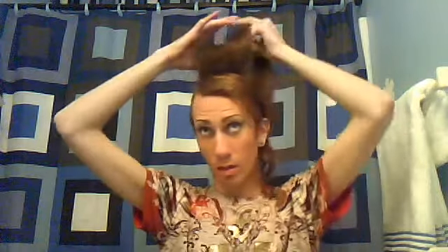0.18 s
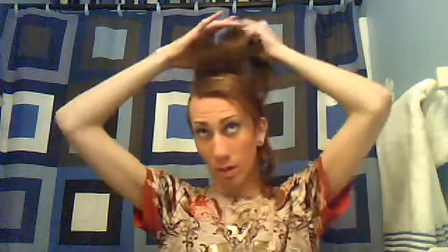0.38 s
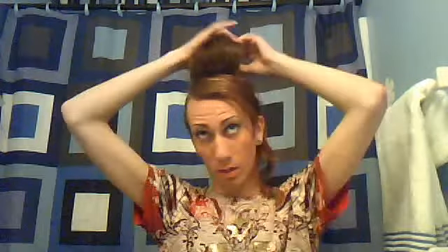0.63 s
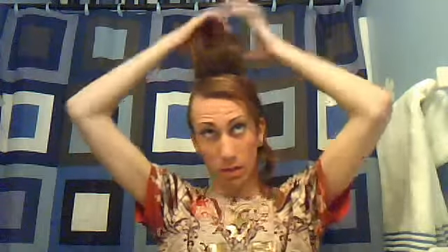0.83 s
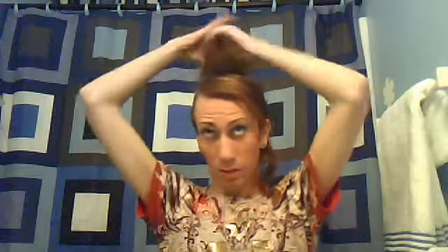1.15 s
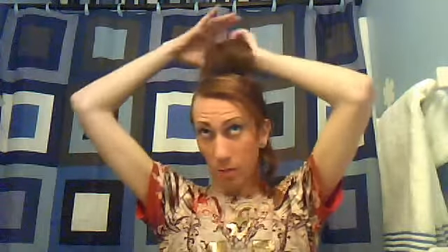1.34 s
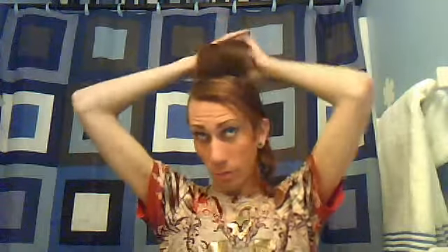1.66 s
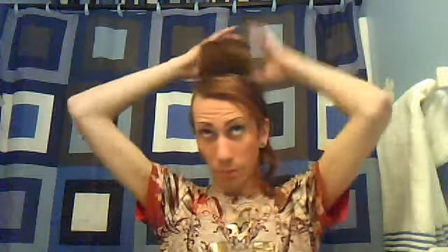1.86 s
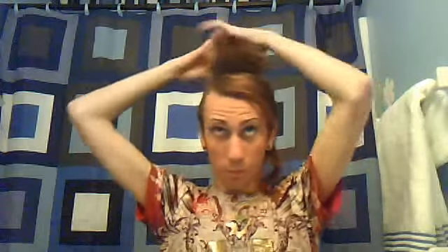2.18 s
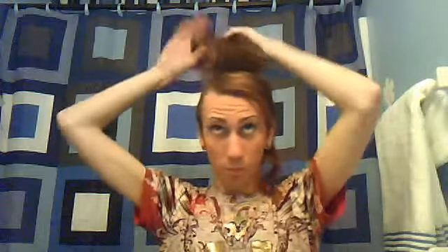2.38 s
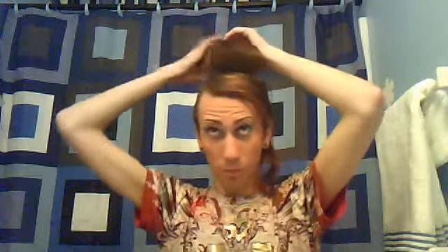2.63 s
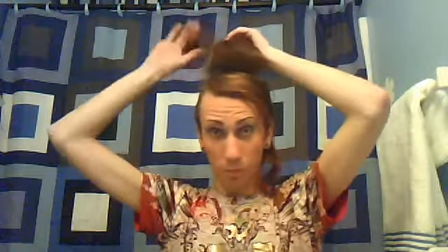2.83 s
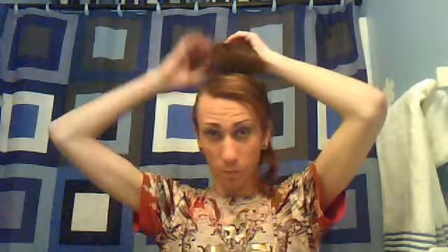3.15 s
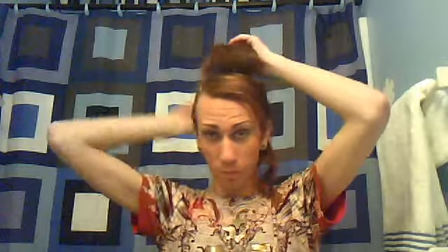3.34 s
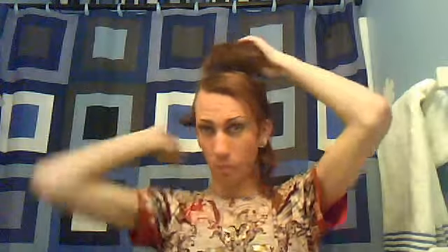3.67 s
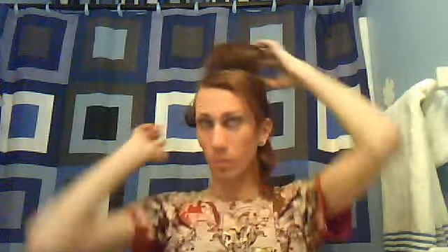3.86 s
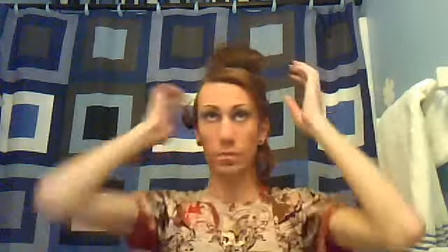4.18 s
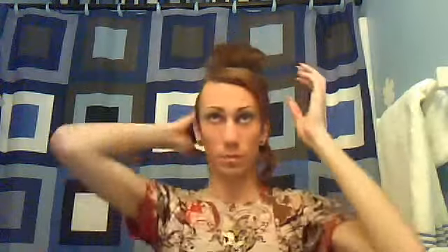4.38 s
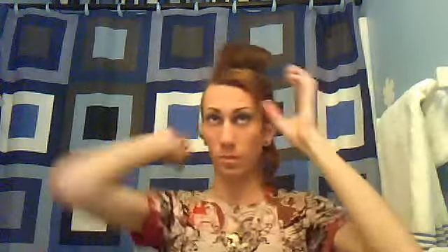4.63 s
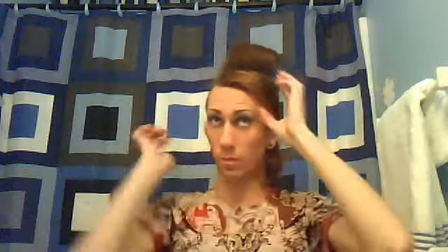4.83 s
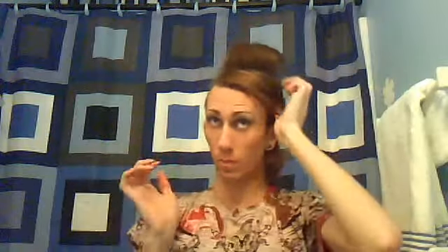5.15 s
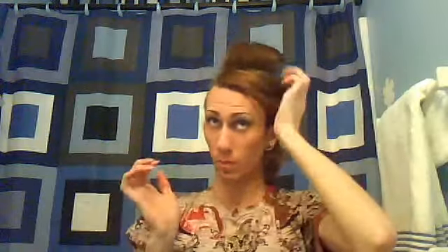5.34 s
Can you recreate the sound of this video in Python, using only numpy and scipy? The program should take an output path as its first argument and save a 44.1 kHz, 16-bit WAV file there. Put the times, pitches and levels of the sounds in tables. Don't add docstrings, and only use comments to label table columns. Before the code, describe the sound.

Quiet bathroom through a noisy mono laptop microphone: deep steady electrical hum, slight motor whine, rumble and grainy hiss. Short blurred clicks, like wireless data leaking into a microphone wire, repeat in regular pairs for two seconds, fade to barely noticeable bumps, then resume from about 4.2 to 4.8 seconds. A very faint high whine pulses rapidly throughout. No audible hair handling or speech; treble is dulled.

```python
import sys
import numpy as np
from scipy import signal
from scipy.fft import rfft, irfft, next_fast_len
from scipy.io import wavfile
from scipy.ndimage import uniform_filter1d, map_coordinates

SR = 44100
rng = np.random.default_rng(int(sys.argv[2]) if len(sys.argv) > 2 else 0)


def unload_audio(sound):
    columns = np.transpose(np.atleast_2d(sound))
    steps = np.round(np.clip(columns, -1, 1) * 32767)
    wavfile.write(sys.argv[1], SR, steps.astype(np.int16))


def voltage_ratio(decibels):
    exponent = np.asarray(decibels, float) / 20
    return 10 ** exponent


N = 242550
T = np.arange(N) / SR


def wobble(rate):
    return map_coordinates(rng.standard_normal(int(N * rate / SR) + 4), [T * rate])


def filtered(x, response):
    m = next_fast_len(N + SR // 2)
    return irfft(rfft(x, m) * response(np.fft.rfftfreq(m, 1 / SR)), m)[..., :N]


def tone(rms_db, turns):
    return np.sqrt(2) * voltage_ratio(rms_db) * np.cos(2 * np.pi * turns)


MAINS_HZ = 60.012
CREST_S, OVERTONE_LAG_S = .0081, .0008
# multiple of the mains pitch, level_db (rms), polarity (+1 or -1)
MAINS_OVERTONES = [(1, -24, 1), (2, -35, 1), (3, -54, -1), (4, -63, 1), (5, -60, -1), (6, -49.5, -1),
                   (7, -60, -1), (8, -65, 1), (9, -64.5, 1), (10, -64, 1), (12, -66, -1), (16, -77, 1),
                   (18, -73, -1), (24, -78, 1)]


def mains():
    hum = np.zeros(N)
    for multiple, level_db, polarity in MAINS_OVERTONES:
        lag_s = OVERTONE_LAG_S * (multiple not in (1, 3))
        flicker_db = .08 * np.sqrt(multiple) * wobble(12)
        turns = multiple * MAINS_HZ * (T - CREST_S - lag_s)
        hum += polarity * tone(level_db + flicker_db, turns)
    return hum


FAN_HZ = 64.97
# multiple of the shaft speed, level_db (rms)
FAN_TONES = [(5, -57), (8, -69), (12, -63), (13, -55), (16, -75), (26, -73)]
# pitch_hz, level_db (rms)
DISC_TONE = (89.98, -51)


def motors():
    shaft_turns = FAN_HZ * T + .008 * wobble(1.2)
    whine = np.zeros(N)
    for multiple, level_db in FAN_TONES:
        whine += tone(level_db + .8 * wobble(5), multiple * shaft_turns + rng.random())
    disc_hz, disc_db = DISC_TONE
    return whine + tone(disc_db + .8 * wobble(4), disc_hz * T + rng.random())


# pitch_hz, level_db (per Hz)
ROOM_RUMBLE = [(20, -67), (130, -75), (350, -88), (850, -88), (1000, -93), (1500, -92), (2500, -100),
               (2800, -115)]
# pitch_hz, level_db (per Hz)
PREAMP_HISS = [(2750, -104), (4500, -107.5), (6500, -110.5), (7500, -107), (9250, -109.5), (9500, -119)]


def rumble_and_hiss(patchy_db):
    z = signal.stft(rng.standard_normal(N), nperseg=512)[2]
    patches = uniform_filter1d(rng.standard_normal(z.shape), size=5, axis=0)
    patches = uniform_filter1d(patches, size=6, axis=1)
    z *= voltage_ratio(patchy_db * patches / patches.std())
    noise = signal.istft(z, nperseg=512)[1][:N]

    def gain(f, table, above_db):
        hz, db = np.transpose(table)
        return voltage_ratio(np.interp(np.log(f + 1), np.log(hz), db, right=above_db))

    def colour(f):
        both = np.hypot(gain(f, ROOM_RUMBLE, -200), gain(f, PREAMP_HISS, None))
        return np.sqrt(SR / 2) * both

    return filtered(noise, colour)


BUS_HZ = 8000
FRAME_S, FIRST_S, SEND_S = .069828, .042, .0342
# pitch_hz, level_db (rms)
CLOCK_TONES = [(4000, -92), (4661, -92), (4723, -93), (4785, -93), (5000, -94), (7000, -92)]


def camera_bus():
    sending = (T - FIRST_S) % FRAME_S < SEND_S
    sending = uniform_filter1d(1. * sending, size=24)
    clock = sum(tone(level_db, hz * T + rng.random()) for hz, level_db in CLOCK_TONES)
    return sending * tone(-63 + .6 * wobble(40), BUS_HZ * T) + clock


TRIPLE_MS = (0, .31, .62)
POLL_START_S, POLL_S, REPLY_S, LATE_S = .0995, .178, .0575, .002
POLL_DB, REPLY_DB, SCATTER_DB = -33, -32.4, .5
# start_s of the poll, reply_wait_ms
HEARD_EXCHANGES = [(.0991, 59.1), (.2761, 60.1), (.4561, 54.2), (.6321, 58), (.8102, 61.9), (.9912, 55.9),
                   (1.1733, 48.8), (1.3472, 56.1), (1.5262, 62), (1.7012, 59), (1.8792, 58.3), (2.0572, 59),
                   (4.1947, 58.7), (4.3723, 59.5), (4.5493, 60.1), (4.7304, 55)]
# start_s, level_db (pickup), then the start_ms of each later packet
UNEVEN_BURSTS = [
    (1.3472, -31.5, .86, 1.18, 1.47),
    (2.1162, -33, .32, .7),
    (4.1947, -34, .29),
    (4.4318, -32.6, .32, 1.11, 1.41),
    (4.5493, -31, .32, 1.2, 1.52),
    (4.7854, -31.5, .33, .79),
]


def schedule():
    poll_s, wait_ms = np.transpose(HEARD_EXCHANGES)
    scatter_db = SCATTER_DB * rng.standard_normal((len(poll_s), 2))
    starts_s = np.r_[poll_s, poll_s + wait_ms / 1000]
    levels_db = np.r_[POLL_DB + scatter_db[:, 0], REPLY_DB + scatter_db[:, 1]]
    uneven_s = np.array([row[0] for row in UNEVEN_BURSTS])
    heard = [(s, db, TRIPLE_MS) for s, db in zip(starts_s, levels_db) if np.abs(s - uneven_s).min() > .01]
    heard += [(s, db, (0, *later)) for s, db, *later in UNEVEN_BURSTS]
    clock_s = np.arange(POLL_START_S, N / SR, POLL_S)
    clock_s = clock_s[np.abs(clock_s[:, None] - poll_s).min(axis=1) > POLL_S / 2]
    late_s = LATE_S * rng.standard_normal((len(clock_s), 2))
    other_s = clock_s[:, None] + [0, REPLY_S] + late_s
    return heard, other_s.ravel()


PACKET_MS = .24


def packets(bursts):
    edges = np.zeros(N + SR)
    for start_s, gain, starts_ms in bursts:
        at = start_s * SR + np.array(starts_ms) * SR / 1000
        edges[np.round(at).astype(int)] += gain
        edges[np.round(at + PACKET_MS * SR / 1000).astype(int)] -= gain
    return np.cumsum(edges)[:N]


OTHER_BAND_DB, OTHER_LEAK_DB = -.6, -56.5
# start_s, level_db (pickup)
STRAY_SPIKES = [
    (.6951, -37),
    (1.3508, -38),
    (1.8183, -48),
]


def radio():
    heard, other_s = schedule()
    leaks = [(s, voltage_ratio(OTHER_LEAK_DB), TRIPLE_MS) for s in other_s]
    pickup = packets([(s, voltage_ratio(db), starts) for s, db, starts in heard] + leaks)
    jolts = [(s, voltage_ratio(OTHER_BAND_DB), TRIPLE_MS) for s in other_s]
    drain = packets([(s, 1.25, starts) for s, _, starts in heard] + jolts)
    for start_s, level_db in STRAY_SPIKES:
        pickup[round(start_s * SR):][:3] += voltage_ratio(level_db)

    def supply(f):
        return voltage_ratio(32) / (340 + 2j * np.pi * f) * 1j * f / (12 + 1j * f)

    def wire(f):
        first_cut = 1 - (f / 7500) ** 2 + .75j * f / 7500
        second_cut = 1 - (f / 9000) ** 2 + 1.9j * f / 9000
        return voltage_ratio(-1) / first_cut / second_cut

    return filtered(pickup, wire) + filtered(drain, supply)


def scene():
    return (mains() + motors() + rumble_and_hiss(patchy_db=.5) + camera_bus() + radio())[None]


TOP_HZ = 10700
STARVED_HZ, STARVED_SHARE = (3750, 5550), .45


def coarse_capture(x, noise_db, gain_db):
    hz, t, z = signal.stft(x, SR, nperseg=768, boundary="even")
    starved = (hz > STARVED_HZ[0]) & (hz < STARVED_HZ[1])
    level = np.abs(z[:, starved]).mean(axis=1, keepdims=True)
    z[:, starved] *= np.maximum(level / np.median(level), 1) ** -STARVED_SHARE
    band = np.exp(uniform_filter1d(np.log(np.abs(z) + 1e-9), size=45, axis=1))
    coarse = np.interp(hz, [900, 2500, 6000, 9500], [0, .5, 1.1, 2.1])[:, None]
    error = signal.stft(rng.standard_normal(N), SR, nperseg=768)[2]
    error /= np.abs(error).mean()
    gain_steps = np.repeat(rng.standard_normal((11, len(t))), 35, axis=0)
    z = z * voltage_ratio(gain_db * coarse * gain_steps) + voltage_ratio(noise_db) * coarse * band * error
    return signal.istft(z * (hz < TOP_HZ)[:, None], SR, nperseg=768)[1][..., :N]


# pitch_hz, level_db
MIRROR_IMAGE = [(11000, -6), (11500, -10), (12000, -22), (12500, -36)]


def upsampled(x):
    hz, db = np.transpose(MIRROR_IMAGE)
    mirrored = x * (-1.) ** np.arange(N)
    return x + filtered(mirrored, lambda f: voltage_ratio(np.interp(f, hz, db, left=-200, right=-200)))


def top_cut(x):
    return signal.sosfilt(signal.butter(12, 12250, fs=SR, output="sos"), x)


def record(dry):
    captured = coarse_capture(dry, noise_db=-4, gain_db=1.3)
    return top_cut(upsampled(captured))


dry = scene()
out = record(dry)
unload_audio(out)
```